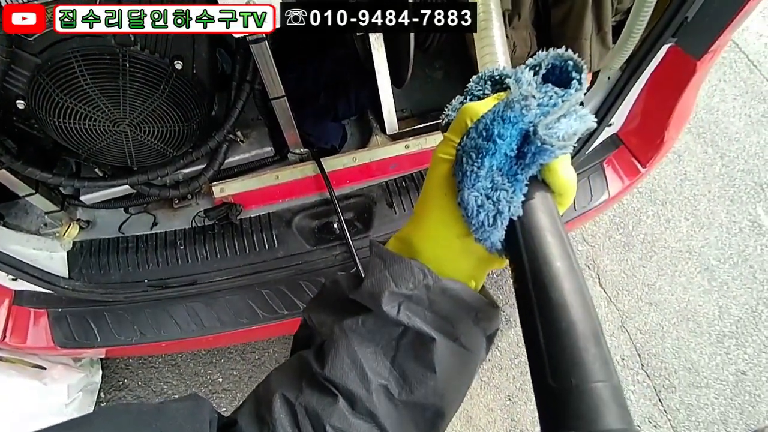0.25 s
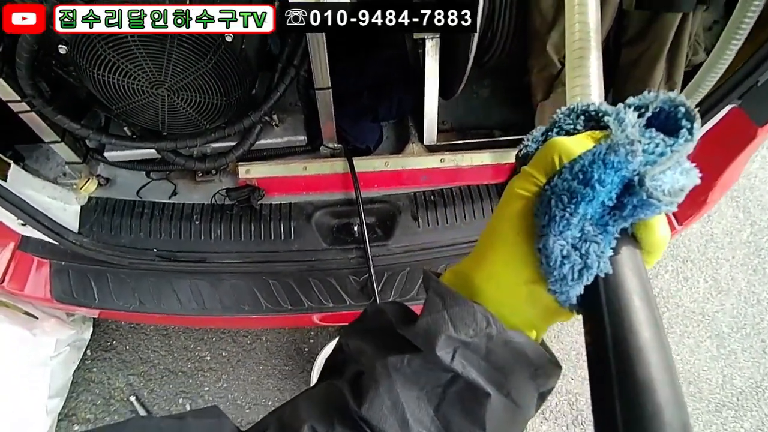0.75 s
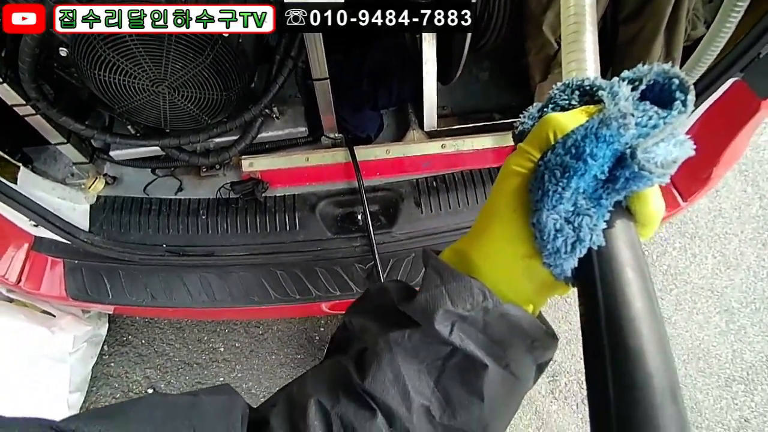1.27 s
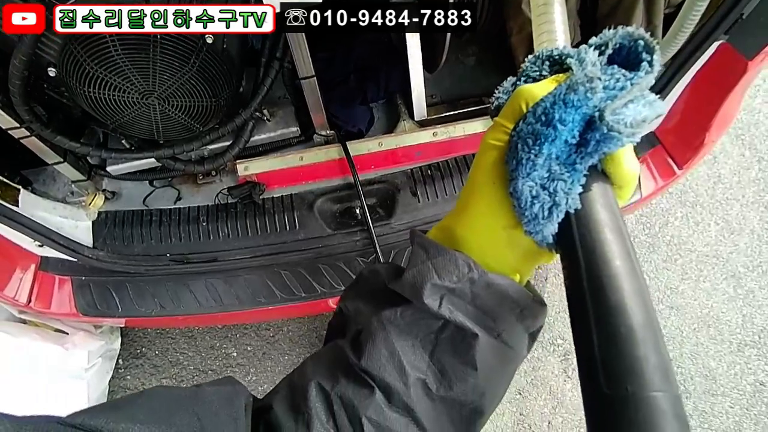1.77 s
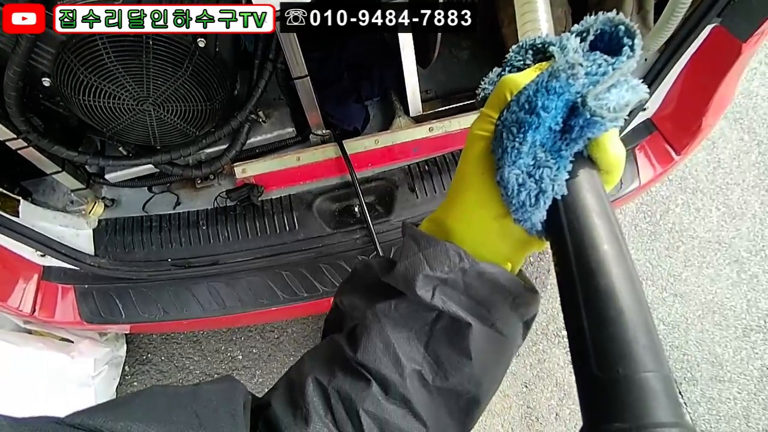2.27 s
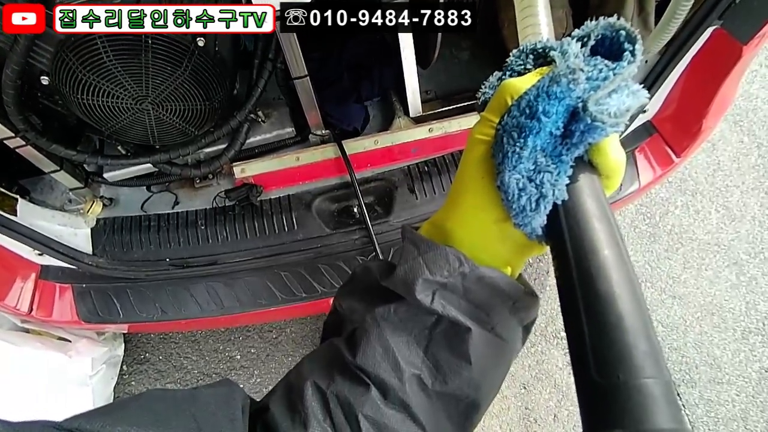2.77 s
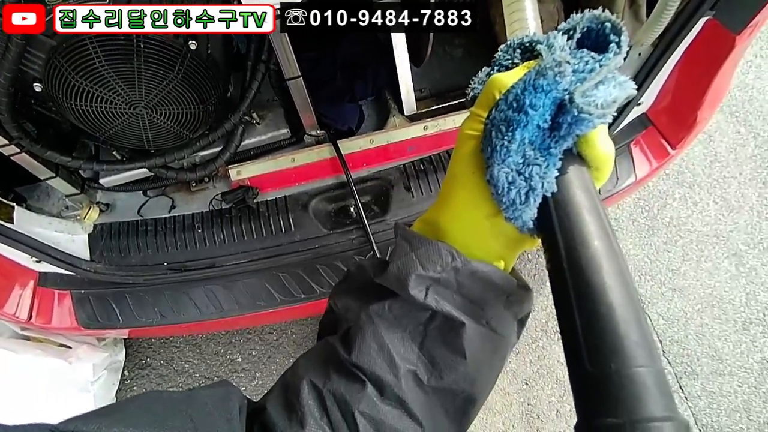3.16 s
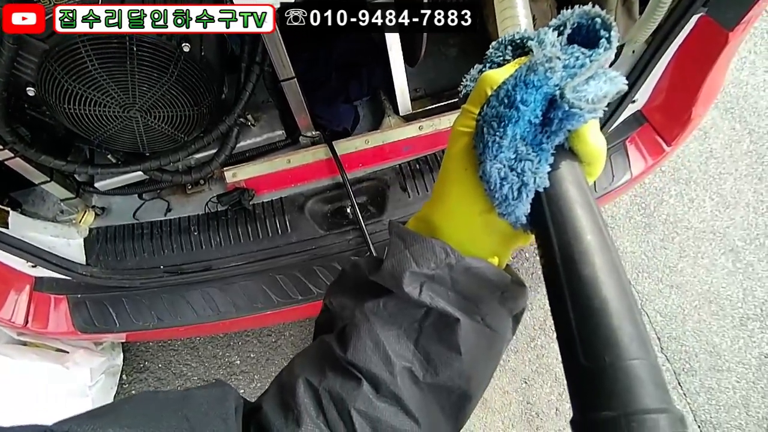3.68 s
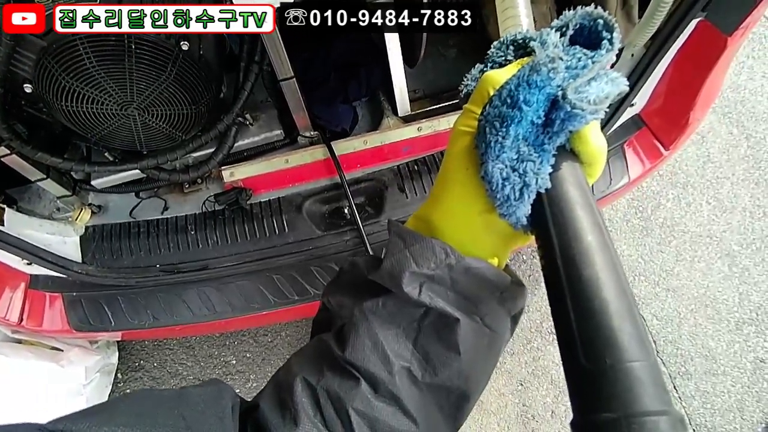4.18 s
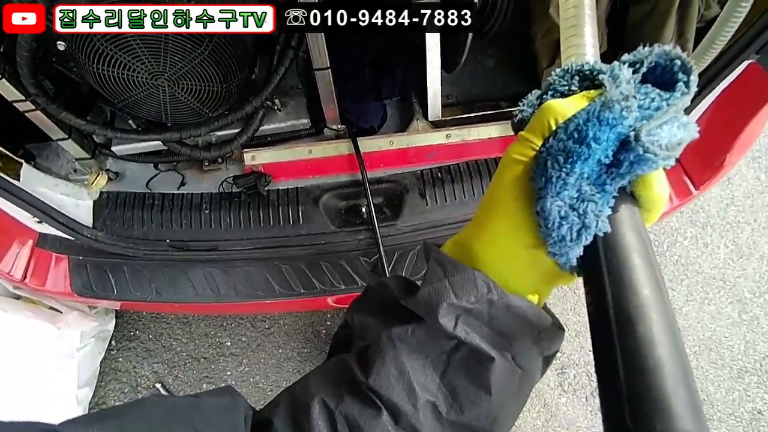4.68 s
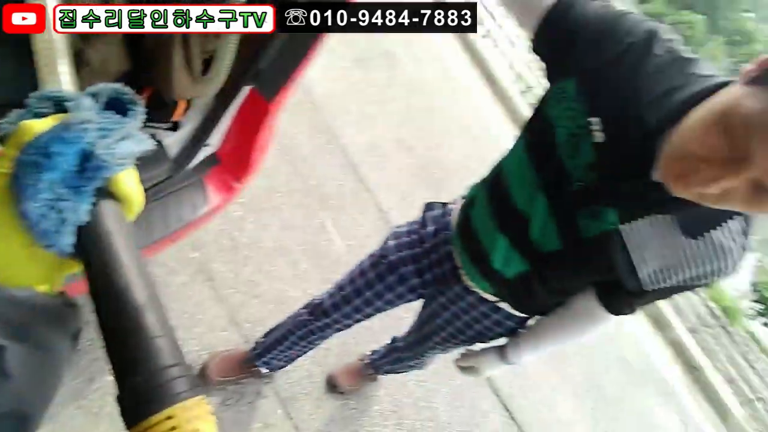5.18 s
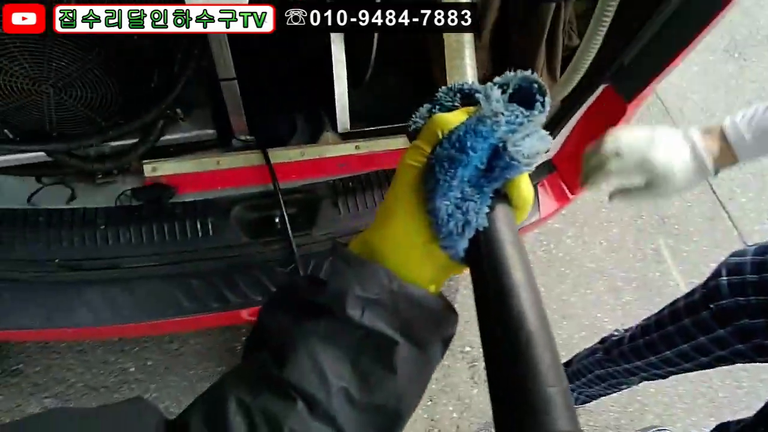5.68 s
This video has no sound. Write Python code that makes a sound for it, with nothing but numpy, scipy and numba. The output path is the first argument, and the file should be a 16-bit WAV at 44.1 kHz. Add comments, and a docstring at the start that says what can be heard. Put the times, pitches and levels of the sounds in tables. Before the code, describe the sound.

A cordless blower whines piercingly with a rush of air, briefly coasts down, spins back up, then dulls for a moment near the end.

```python
"""A cordless blower, held at arm's length with a rag round its nozzle, blows into a hose at the open boot of a van.
Its nine-blade fan whines: a tone at the blade-passing rate, shaken by random eddies. Shaped noise makes the air
roaring in the tube and hissing at the intake; motor and shell add thin tones and a whirr. The trigger is let go
for a moment: the fan coasts and spins up again. Near the end the microphone swings aside and back.
The loudest peaks overload it."""
import sys
import numpy as np
from scipy import signal
from scipy.fft import rfft, irfft
from scipy.io import wavfile
from scipy.ndimage import uniform_filter1d
from numba import njit

SR = 44100
rng = np.random.default_rng(int(sys.argv[2]) if len(sys.argv) > 2 else 0)


def master_out(mix):
    """Clip the mix to full scale and print it as 16-bit PCM to the path in sys.argv[1]."""
    frames = np.transpose(np.atleast_2d(mix))
    ceiling = np.clip(frames, -1, 1)
    pcm = np.round(ceiling * 32767).astype(np.int16)
    wavfile.write(sys.argv[1], SR, pcm)


N = 261954

T = np.arange(N) / SR
FREQS = np.maximum(np.arange(N // 2 + 1) * SR / N, 1)
BLADES = 9
FULL_HZ = 3228  # blade-passing rate that counts as full speed


def db_to_gain(db):
    """Turn decibels into a gain."""
    return 10 ** (np.asarray(db) / 20)


def unit(x):
    """Scale to rms 1."""
    return x / np.sqrt(np.mean(x ** 2))


def curve(rows):
    """Join (time, value) rows by straight lines."""
    return np.interp(T, *np.transpose(rows))


def colour(points):
    """Gain at every frequency, joining (Hz, dB) points on a logarithmic frequency scale."""
    hz, db = np.transpose(points)
    return db_to_gain(np.interp(np.log(FREQS), np.log(hz), db))


def filtered(x, gains):
    """Apply the given gain at every frequency."""
    return irfft(rfft(x) * gains, N)


def noise(gains):
    """Noise of rms 1, coloured by the given gain at every frequency."""
    return unit(filtered(rng.standard_normal(N), gains))


def wander(hz):
    """Random motion of rms 1, mostly slower than hz."""
    return noise(1 / (1 + (FREQS / hz) ** 2))


def resonance(hz, width):
    """Gain at every frequency of a resonance: 1 at its centre, half across the given width."""
    return 1 / (1 + ((FREQS / hz - hz / FREQS) * hz / width) ** 2)


# how different the two microphone ports hear a sound: [f/Hz, side minus mid level/dB]
PORT_DIFFERENCE = [(60, -22), (500, -78), (1800, -39), (4400, -19.5), (8000, -12), (15000, -6.5)]


def ports(x):
    """Left and right: the two ports hear mostly the same, but differ more in the treble than in the middle."""
    phase_shift = np.cumsum(rng.standard_normal(len(FREQS))) * .15
    side = filtered(x, colour(PORT_DIFFERENCE) * np.exp(1j * phase_shift))
    return np.array([x + side, x - side])


RELEASE_S, PULL_S = .092, .484  # the trigger is let go and pulled again
# coasting: blade-passing rate at its start, the rate it falls towards, and the time scale of the fall
COAST_FROM_HZ, COAST_TO_HZ, COAST_S = 3240, 1625, .108
STRAIN_HZ, SPIN_UP_S = 3300, .237  # spin-up: rate the motor strains towards, time constant
LOAD_WAVER_HZ = 1.5  # the load keeps changing: rms waver of the blade-passing rate
# top blade-passing rate that battery and load allow: [t/s, f/Hz]
TOP_SPEED = [(1.4, 3245), (2.3, 3239), (2.7, 3227), (3.3, 3231), (4.8, 3224), (5.25, 3235)]


def fan_speed():
    """Blade-passing rate: the fan coasts while the trigger is let go, then climbs to what the battery allows."""
    coasted = np.maximum(T - RELEASE_S, 0)
    driven = np.maximum(T - PULL_S, 0)
    coast = COAST_TO_HZ + (COAST_FROM_HZ - COAST_TO_HZ) * np.exp(-(coasted / COAST_S) ** 1.5)
    climb = STRAIN_HZ - (STRAIN_HZ - COAST_TO_HZ) * np.exp(-driven / SPIN_UP_S)
    powered = np.minimum(climb, curve(TOP_SPEED))
    return np.where(T < PULL_S, coast, powered) + LOAD_WAVER_HZ * wander(2.25)


SURGE_S = 0.016  # from a surge's peak to where its dB have dropped to 1/e
# brief swells of the blade tone: [t/s, level/dB]
SURGES = [(.025, 0.5), (.915, 2.5), (1.21, 2.5), (2.77, 2), (3.93, 2.5), (4.72, 3.5), (4.925, 3),
          (5.758, 2), (5.795, 2.5)]


def surges():
    """Level in dB: now and then a large eddy is swallowed and the tone swells for an instant."""
    return sum(db * np.exp(-((T - start) / SURGE_S) ** 2) for start, db in SURGES)


STALL_FLUTTER = .9  # slow blades meet the air badly: added flutter per share of speed lost
CUT_ON_HZ = 2080  # below this the duct no longer carries the spinning pressure pattern
# peaks and dips of the duct that the gliding blade tone passes through: [f/Hz, level/dB]
DUCT = [(2150, -8), (2290, 2), (2380, -2), (2460, 2), (2530, -5), (2610, 3), (2740, -5), (2840, 1.5),
        (2940, -1.5), (3100, 0)]


def blade_tone(blade_hz, level_db, flutter=.15, eddy_hz=250, sway=.145, sway_hz=42, drift_hz=2,
               port_lag=.1, throb_db=.7, throb_hz=20):
    """Blades chop the inflow; eddies in it shake the tone in level and phase and give it a rough skirt."""
    phase = 2 * np.pi * np.cumsum(blade_hz + drift_hz * wander(8.7)) / SR
    eddies = 1 / np.sqrt(1 + (FREQS / eddy_hz) ** 4)
    gusts = db_to_gain(2 * wander(27))
    stall = STALL_FLUTTER * np.maximum(1 - blade_hz / FULL_HZ, 0)
    fast_shake = (flutter + stall) * gusts * (noise(eddies) + 1j * noise(eddies))
    slow_shake = sway * (wander(sway_hz) + 1j * wander(sway_hz))
    carried = 1 / (1 + (CUT_ON_HZ / blade_hz) ** 24)
    level = np.sqrt(2) * carried * db_to_gain(level_db + surges() + throb_db * wander(throb_hz))
    tone = (1 + fast_shake + slow_shake) * np.exp(1j * phase) * level
    # the ports hear it slightly out of step (lag in radians)
    heard = np.real(tone * np.exp(1j * port_lag * np.array([[1], [-1]])))
    return filtered(heard, colour(DUCT))


# weak tones of the rotor: [multiple of the shaft rate, level/dB at full speed]
SHAFT_TONES = [(1, -39.5), (10, -56), (13, -47), (19, -44)]
# resonance of the motor housing: [f/Hz, level/dB]
HOUSING = [(5700, -26), (6200, -14), (6380, -3), (7000, 0), (7300, 0), (7600, -7), (8100, -18)]


def motor(blade_hz, speed_db, torque, pole_db=-44, overtone_db=-39, torque_db=15, rough=.62, rough_hz=170,
          patchy_db=4):
    """Unbalance adds thin tones; the poles sing in the housing, louder while they pull the fan up to speed."""
    shaft = 2 * np.pi * np.cumsum(blade_hz + 6 * wander(124)) / BLADES / SR
    rotor = 0
    for order, db in SHAFT_TONES:
        rotor = rotor + db_to_gain(db) * (1 + .5 * wander(22)) * np.sin(round(order) * shaft)
    pole_level = db_to_gain(pole_db + torque_db * torque + 2 * speed_db)
    pole = pole_level * np.sin(20 * shaft) * (1 + .5 * wander(40))
    # rough overtones sweep through the same resonance when the fan turns slowly
    scatter = 1 - rough + rough * (wander(rough_hz) + 1j * wander(rough_hz))
    overtone_level = db_to_gain(overtone_db + 2 * speed_db + patchy_db * wander(18))
    overtones = overtone_level * np.real(scatter * (np.exp(30j * shaft) + np.exp(40j * shaft)))
    sung = filtered(pole + overtones, colour(HOUSING))
    return np.sqrt(2) * (rotor * db_to_gain(7.7 * speed_db) + sung)


# resonances of the plastic shell: [f/Hz, width/Hz, level/dB]
SHELL = [(1420, 42, -54), (1630, 30, -55), (3300, 270, -48), (5550, 110, -57)]


def bearings():
    """The running bearings ring the plastic shell: a hollow whirr, laid bare when the air dies down."""
    whirr = 0
    for hz, width, db in SHELL:
        whirr = whirr + noise(resonance(hz, width)) * db_to_gain(db + 2.6 * wander(18))
    return whirr


FLOW_LAG_S = 0.0057  # the air in tube and hose follows the fan this much later
# air resonances of tube and hose: [f/Hz, width/Hz, relative level/dB before weighting by width]
TUBE = [(275.6, 55, -11), (364.5, 53, -9), (492.3, 79, -1.5), (576, 65, 0.5), (655, 97, 1.5),
        (827, 148, -4.5), (980, 114, -10.5), (1140, 150, -15.5), (1407, 39, -10.5), (1533, 130, -14.5)]
# air resonances that the side of the tube radiates: [f/Hz, width/Hz, level/dB]
TUBE_SIDE = [(743, 40, -24.5), (1065, 22, -35), (1440, 160, -45)]


def tube_roar(flow_db, aside, db=-16.5, aside_db=-5.0, growth=2.25, brightening=1.3):
    """Turbulence rings the fixed air resonances; the high ones grow fastest with the flow."""
    roar, power = 0, 0
    for hz, width, mode_db in TUBE:
        size = db_to_gain(mode_db) * np.sqrt(width)
        grown_db = (growth + brightening * np.log2(hz / 500)) * flow_db
        roar = roar + size * noise(resonance(hz, width)) * db_to_gain(grown_db + 1.57 * wander(17))
        power += size ** 2
    sideways = sum(db_to_gain(mode_db) * noise(resonance(hz, width)) for hz, width, mode_db in TUBE_SIDE)
    return roar / np.sqrt(power) * db_to_gain(db + aside_db * aside) + aside * sideways


def ribs():
    """Crowded resonances of the duct leave fine, fixed ridges in the hiss."""
    grid = np.arange(0, SR / 2, 55)
    ridge_db = 3.5 * np.clip(rng.standard_normal(len(grid)), -3, 1.2)
    return db_to_gain(np.interp(FREQS, grid, ridge_db))


@njit
def moving_band(x, hz, width):
    """Band-pass filter with a moving centre, gain 1 there."""
    y, band, low = np.empty(len(x)), 0., 0.
    for i in range(len(x)):
        g, k = np.tan(np.pi * hz[i] / SR), width / hz[i]
        v = (band + g * (x[i] - low)) / (1 + g * (g + k))
        band, low, y[i] = 2 * v - band, low + 2 * g * v, k * v
    return y


# first hollow in the hiss, and its rise with the microphone turned fully away
HOLLOW_HZ, HOLLOW_RISE_HZ = 1690, 1200
HOLLOW_DRIFT_HZ = 14  # rms drift as the arm sways
HOLLOW_FADE = .35  # share of their strength lost outside the forward beam
# hollows at 1 and 3 times the first frequency: [width/Hz, level/dB at the centre, in the beam]
HOLLOWS = [(260, -11), (450, -18)]


def hollows(x, turn, aside):
    """A close reflection cancels odd multiples of one frequency; they sweep upward as the microphone turns away."""
    first_hz = HOLLOW_HZ + HOLLOW_RISE_HZ * turn + HOLLOW_DRIFT_HZ * wander(1.2)
    for k, (width, depth_db) in enumerate(HOLLOWS):
        hz = np.minimum((2 * k + 1) * first_hz, .45 * SR)
        removed = (1 - db_to_gain(depth_db)) * (1 - HOLLOW_FADE * aside)
        x = x - removed * moving_band(x, hz, float(width))
    return x


HISS_SPLIT_HZ = 4000  # above this the hiss grows faster with the fan speed
# rush of the intake heard from in front: [f/Hz, relative level/dB per Hz]
HISS_FRONT = [(1250, 1.5), (1620, -2.5), (1900, 4), (2300, 3), (3300, 6), (3800, -3.5), (4600, -8),
              (5400, 3.5), (6000, 1.5), (7200, -2), (8300, -6), (11200, -4), (11900, -10), (15200, -5.5)]
# rush of the intake heard from aside: [f/Hz, relative level/dB per Hz]
HISS_ASIDE = [(900, 1.5), (1500, -2.5), (2300, 0), (2600, -4), (2950, -9), (3500, 3.5), (4400, 0.5),
              (5400, -5), (6300, -9.5), (7300, -9), (8200, -17.5), (11000, -14), (15200, -13.5)]


def intake_hiss(speed_db, turn, aside, front_db=-19.5, side_db=-20.5, beam_db=-15, front_turned_db=-5,
                side_turned_db=-3, growth=3.58, top_growth=0.66, churn_db=1.32, top_churn_db=0.61):
    """Air tears past the grille: a noise beamed forward, duller as the microphone swings away or the fan slows."""
    ridges = ribs() / np.sqrt(1 + (600 / FREQS) ** 8)  # ridges, with the bass cut
    front_level = db_to_gain(front_db + beam_db * aside ** 2 + front_turned_db * turn)
    side_level = db_to_gain(side_db + side_turned_db * turn) * np.sqrt(aside)
    rush = noise(colour(HISS_FRONT) * ridges) * front_level + noise(colour(HISS_ASIDE) * ridges) * side_level
    body = filtered(rush, 1 / (1 + (FREQS / HISS_SPLIT_HZ) ** 8))
    top = (rush - body) * db_to_gain(top_growth * speed_db + top_churn_db * wander(27))
    churned = body * db_to_gain(churn_db * wander(20)) + top
    return hollows(churned, turn, aside) * db_to_gain(growth * speed_db)


# stray air buffeting the microphone: [f/Hz, relative level/dB per Hz]
BUFFET = [(20, -4), (60, -6), (120, -4.5), (170, 0), (400, -45), (1000, -50)]
# soft knocks of the hands on the housing: [t/s, f/Hz, starting level/dB, decay/s]
KNOCKS = [(.115, 151.3, -36, 0.015), (1.67, 120, -41, .025), (3.92, 50, -44, .03), (5.55, 125, -31, 0.012)]


def handling(speed_db, buffet_db=-60.0):
    """Stray air puffs on the microphone as low noise; the hands bump the housing as short, dying tones."""
    out = noise(colour(BUFFET)) * db_to_gain(buffet_db + 2.0 * speed_db + 3.3 * wander(5.8))
    for start, hz, db, decay in KNOCKS:
        age = np.maximum(T - start, 0)
        out = out + db_to_gain(db) * np.sin(2 * np.pi * hz * age) * np.exp(-age / decay)
    return out


def street(x, wet_db=-30, t60=0.8, dull_hz=2000):
    """House fronts return a faint, dull tail that lingers while the fan coasts."""
    tail = rng.standard_normal((2, SR)) * db_to_gain(-60 * T[:SR] / t60)
    tail /= np.sqrt(np.sum(tail ** 2, axis=1, keepdims=True))
    dull = signal.sosfilt(signal.butter(1, dull_hz, fs=SR, output="sos"), x)
    return db_to_gain(wet_db) * signal.fftconvolve(dull, tail, axes=1)[:, :N]


def intake_rasp(speed_db, torque, db=-23, hz=3500, width_hz=750, growth=4, churn_db=0.5):
    """While the fan outruns the air, the flow breaks off the blades and rasps in the intake's resonance."""
    level_db = db + growth * speed_db + surges() + churn_db * wander(25)
    return noise(resonance(hz, width_hz)) * np.sqrt(torque) * db_to_gain(level_db)


# blade tone: level at full speed before turning and nearness, and its change when turned fully away
WHINE_DB, WHINE_TURNED_DB = -10.5, -20.5
WHINE_GROWTH = 10.0  # dB per dB of fan speed
WHINE_COASTING_DB = -2.5  # change while the blades coast unloaded
FULL_PULL_HZ_PER_S = 1000  # rise of the blade-passing rate from which the motor counts as pulling hard
BEAM_EDGE = 0.35  # share of the turn around which the microphone leaves the forward beam
# how far the microphone is turned away from the intake: [t/s, share 0-1]
TURN = [(5.06, 0.03), (5.12, 0.3), (5.22, 0.6), (5.32, 1), (5.4, 0.74), (5.49, 0.28), (5.58, 0.39),
        (5.63, 0.1), (5.72, 0.06)]
# the intake is held nearer to or farther from the microphone: [t/s, level/dB]
NEARNESS = [(0, 1.2), (1.4, -0.54), (2.0, 0.5), (2.3, 0.7), (3.3, 0), (4.4, 1.5), (5.0, -0.2), (5.8, 1.8)]


def scene():
    """Fan speed drives most layers; turning the microphone away takes it out of the beam of whine and hiss."""
    blade_hz = fan_speed()
    speed_db = 20 * np.log10(blade_hz / FULL_HZ)
    flow_db = np.interp(T - FLOW_LAG_S, T, speed_db)
    # a rising speed means the motor pulls, a falling one that the fan coasts
    pull = uniform_filter1d(np.gradient(blade_hz) * SR, SR // 10) / FULL_PULL_HZ_PER_S
    torque, coasting = np.clip(pull, 0, 1), np.clip(-pull, 0, 1)

    turn, near_db = np.maximum(curve(TURN), 0), curve(NEARNESS)
    aside = np.tanh(turn / BEAM_EDGE)
    whine_db = WHINE_DB + WHINE_GROWTH * speed_db + WHINE_COASTING_DB * coasting
    whine_db = whine_db + WHINE_TURNED_DB * turn + near_db

    whine = blade_tone(blade_hz, whine_db)
    machine = motor(blade_hz, speed_db, torque) + bearings()
    intake = (intake_hiss(speed_db, turn, aside) + intake_rasp(speed_db, torque)) * db_to_gain(near_db)
    air = tube_roar(flow_db, aside) + intake + handling(speed_db)
    direct = whine + ports(air + machine)
    return direct + street(direct)


TOP_HZ = 15350  # treble above this is cut


def record(dry):
    """The microphone rounds off peaks near full scale, and the top is cut."""
    rounded = dry / (1 + dry ** 8) ** (1 / 8)
    return signal.sosfilt(signal.ellip(12, .1, 70, TOP_HZ, fs=SR, output="sos"), rounded)


dry = scene()
out = record(dry)
master_out(out)
```